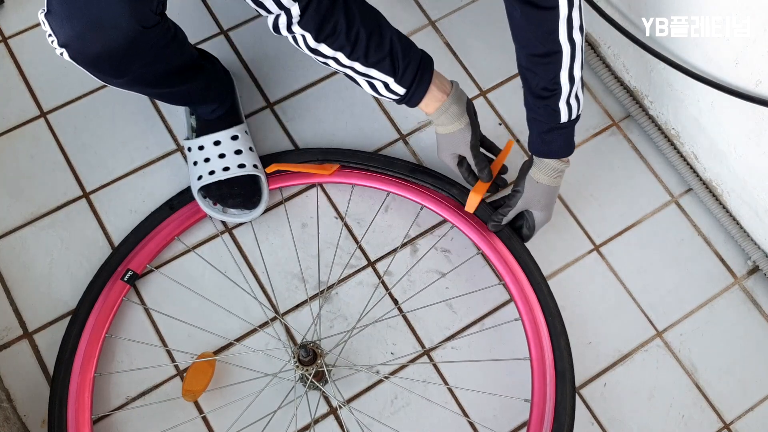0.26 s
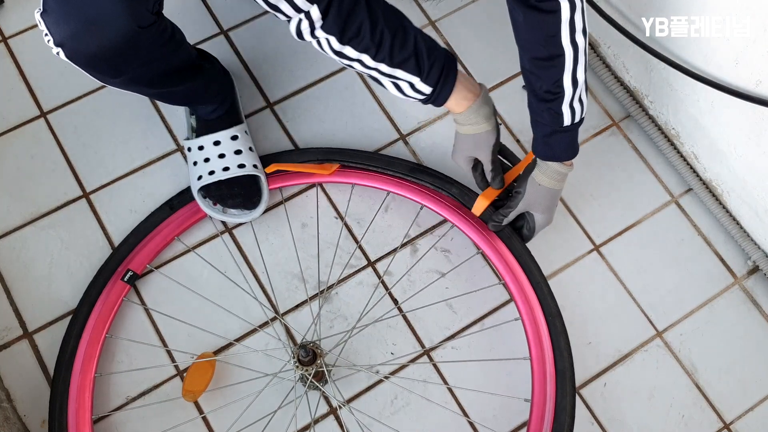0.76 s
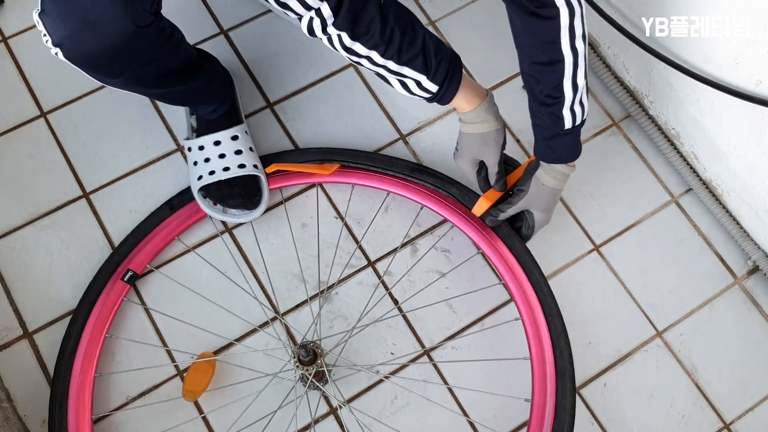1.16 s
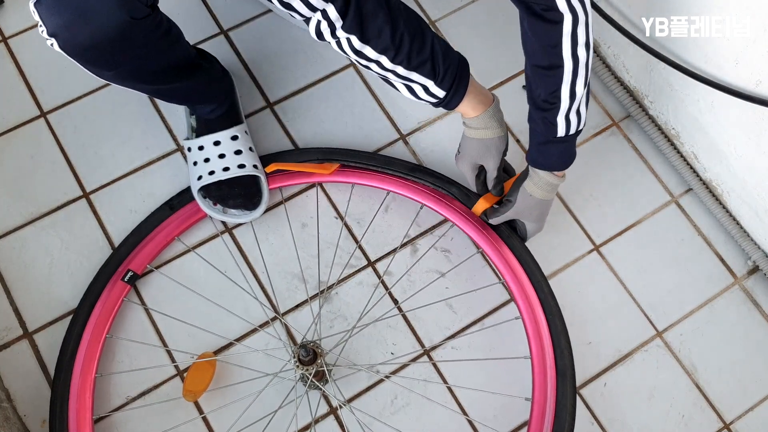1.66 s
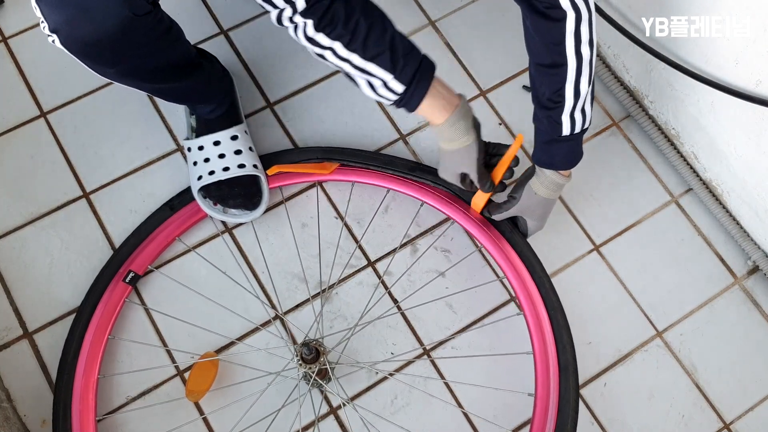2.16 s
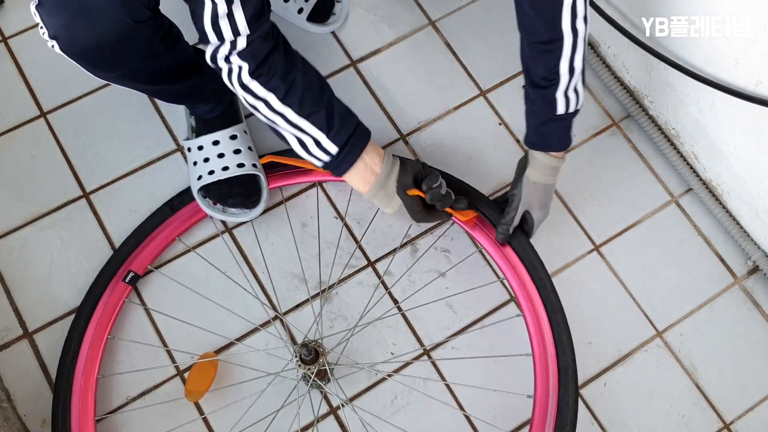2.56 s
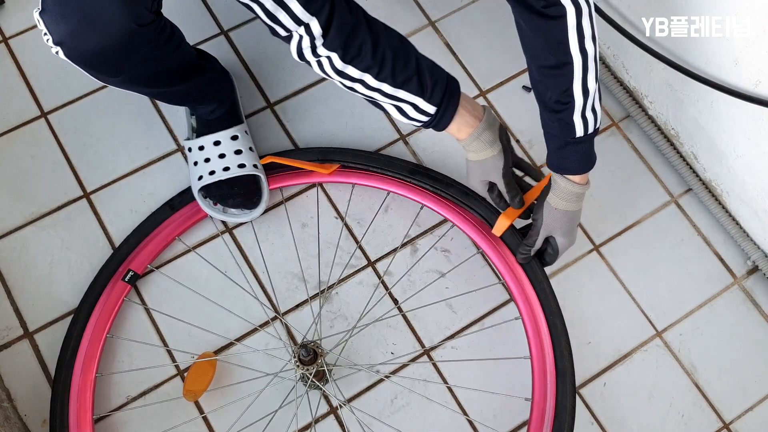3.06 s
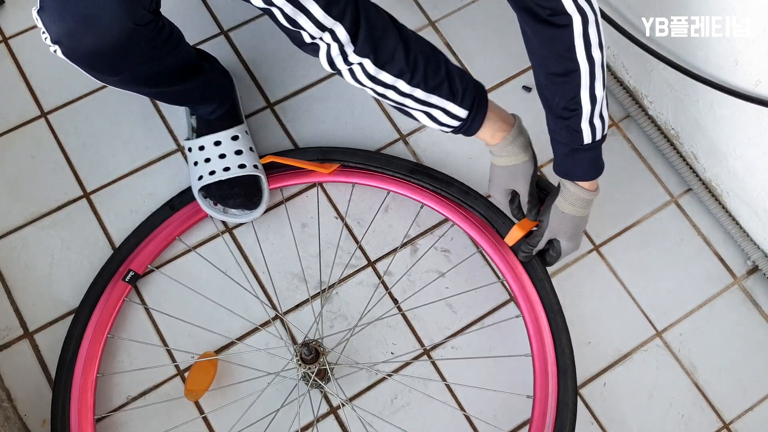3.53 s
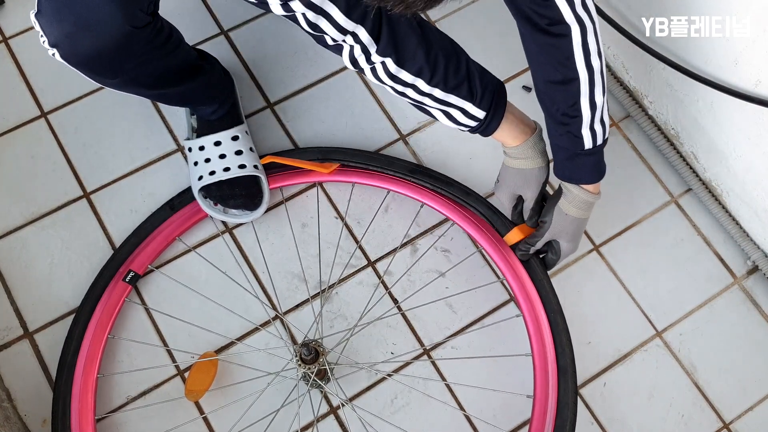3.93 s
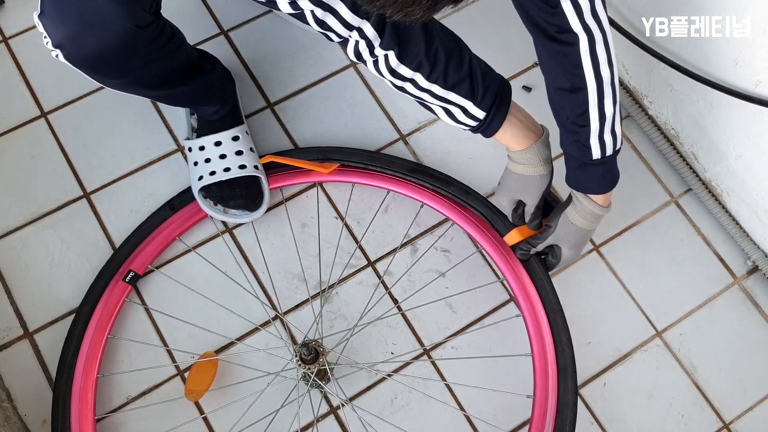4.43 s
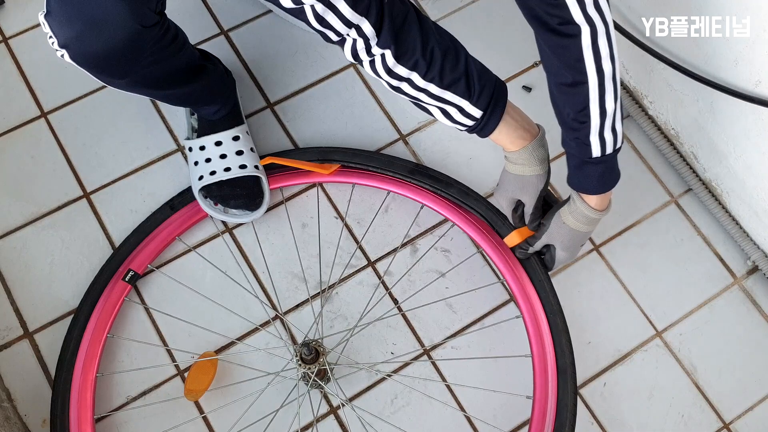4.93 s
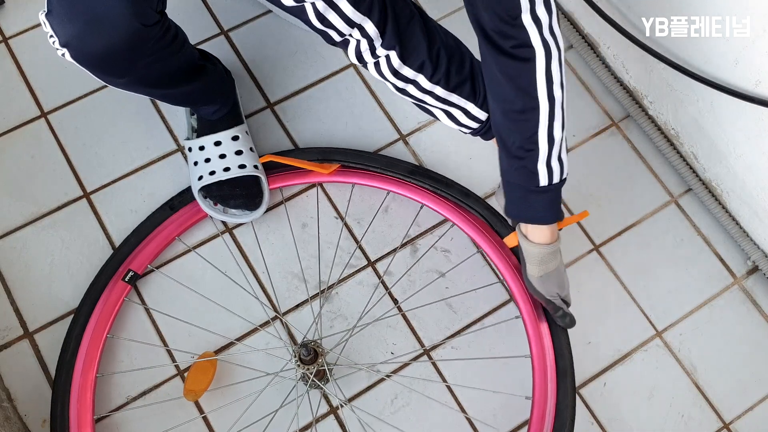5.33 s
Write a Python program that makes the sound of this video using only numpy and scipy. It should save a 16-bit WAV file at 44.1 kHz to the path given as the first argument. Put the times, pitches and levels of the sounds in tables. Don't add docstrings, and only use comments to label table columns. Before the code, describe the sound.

In a small hard-walled room, a plastic lever taps and scrapes a tire, mostly quietly and irregularly. Dull knocks stand out around 1.8 and 3.5 seconds. After a near-silent stretch, a loud snap rings the metal rim at about 5 seconds, with two lower thuds and creaks after it. A nearby stereo microphone also catches low rumble gusts, steady distant city hum and slight hiss.

```python
import sys
import numpy as np
from scipy import signal
from scipy.fft import rfft, irfft
from scipy.io import wavfile

SR = 44100
rng = np.random.default_rng(int(sys.argv[2]) if len(sys.argv) > 2 else 0)


def bounce(signal):
    frames = np.transpose(np.atleast_2d(signal))
    limited = np.clip(frames, -1, 1)
    pcm = np.round(limited * 32767).astype(np.int16)
    wavfile.write(sys.argv[1], SR, pcm)


def nominal_scale(level):
    x = np.asarray(level, float) / 20
    return 10 ** x


N = 246430


def at_hz(points, hz):
    table_hz, values = np.transpose(points)
    return np.interp(np.log(hz), np.log(table_hz), values)


def rms_one(x):
    return x / np.sqrt(np.mean(x ** 2) + 1e-20)


def high_pass(x, hz):
    return signal.sosfilt(signal.butter(3, hz, "high", fs=SR, output="sos"), x)


def edge(x):
    return high_pass(x, 4600)


def ring(force, modes):
    out = 0
    for k, (hz, level_db, t60) in enumerate(modes):
        radius = nominal_scale(-60 / (t60 * SR))
        angle = 2 * np.pi * hz / SR
        poles = [1, -2 * radius * np.cos(angle), radius ** 2]
        mode = signal.lfilter([0, np.sin(angle)], poles, force + 1e-18)
        out = out + (-1) ** k * nominal_scale(level_db) * mode
    return out


def struck(times, levels_db, modes):
    at = np.round(np.asarray(times) * SR).astype(int)
    spot_db = 1.5 * rng.standard_normal((len(at), len(modes)))
    out = 0
    for k, mode in enumerate(modes):
        force = np.zeros(N)
        force[at] = nominal_scale(levels_db + spot_db[:, k]) * (-1) ** k
        out = out + ring(force, [mode])
    return out


def grains(per_s, spread_db):
    sizes = nominal_scale(spread_db * np.minimum(rng.exponential(1, N), 4))
    signs = rng.choice([-1, 1], N)
    return rms_one(sizes * signs * (rng.random(N) < per_s / SR))


def swells(rows, rise_db_per_s, fall_db_per_s):
    start, length, *levels_db = np.transpose(rows)
    t = np.arange(0, N + 64, 64)[:, None] / SR
    early = np.maximum(start - t, 0)
    late = np.maximum(t - start - length, 0)
    shape = nominal_scale(-rise_db_per_s * early - fall_db_per_s * late)
    return [np.interp(np.arange(N) / SR, t[:, 0], shape @ nominal_scale(level_db)) for level_db in levels_db]


# f/Hz, likeness/0..1
LIKENESS = [(60, .97), (130, .997), (250, .95), (500, .9), (1000, .25), (3000, .12), (10000, .1)]


def stereo_noise(size):
    hz = np.arange(size // 2 + 1) * SR / size + 1
    mid, side = rfft(rng.standard_normal((2, size)))
    alike = np.clip(at_hz(LIKENESS, hz), 0, 1)
    white = np.sqrt(1 + alike) * mid + np.sqrt(1 - alike) * side * [[1], [-1]]
    return hz, white / np.sqrt(2)


# f/Hz, level/dB (per Hz)
HUM = [(95, -4.5), (234, -8.5), (290, -12.5), (379, -9), (600, -9.5), (1040, -3), (1650, -11.5),
       (2000, -25)]
# f/Hz, level/dB (per Hz)
HISS = [(2600, -1), (4200, -2), (5000, -6), (6300, -7), (8700, -14), (10500, -8), (13100, -3), (15500, -5)]
HUM_DB, HISS_DB = -61, -76.5


def hum():
    hz, white = stereo_noise(N)
    city = rms_one(irfft(white * nominal_scale(at_hz(HUM, hz)) * (hz > 90) * (hz < 2600), N))
    hiss = rms_one(irfft(white * nominal_scale(at_hz(HISS, hz)) * (hz >= 2600) * (hz < 15900), N))
    return nominal_scale(HUM_DB) * city + nominal_scale(HISS_DB) * hiss


# f/Hz, width/Hz, level/dB
RUMBLE_MODES = [(57.2, 16, 0), (96, 14.6, -13)]
# t/s, length/s, level/dB
GUSTS = [(0.0, 0.096, -60), (0.2, 0.11, -64), (0.4, 0.26, -65.5), (0.84, 0.013, -60.5), (1.09, 0.43, -52.5),
         (1.86, 0.24, -55.5), (2.22, 0.047, -49.5), (2.65, 0.018, -60.5), (2.77, 0.11, -52.5),
         (3.0, 0.13, -61.5), (3.32, 0.1, -49.5), (3.53, 0.017, -59), (3.72, 0.29, -57), (4.32, 0.014, -55),
         (4.55, 0.04, -64.5), (4.8, 0.11, -65), (5.065, 0.22, -51), (5.415, 0.016, -52), (5.56, 0.058, -52)]
GUST_RISE_DB_PER_S, GUST_FALL_DB_PER_S, LULL_DB = 231, 178, -75


def rumble():
    hz, white = stereo_noise(N)
    shape = 0
    for top_hz, width_hz, level_db in RUMBLE_MODES:
        shape = shape + nominal_scale(level_db) / (1 + (2 * (hz - top_hz) / width_hz) ** 2)
    gusts, = swells(GUSTS, GUST_RISE_DB_PER_S, GUST_FALL_DB_PER_S)
    return (nominal_scale(LULL_DB) + gusts) * rms_one(irfft(white * shape, N))


# t/s, length/s, scuff level/dB, scrape level/dB, shove level/dB
RUBS = [(0.0, 0.0033, -57.5, -48.5, -48), (0.47, 0.01, -76, -58, -59), (1.14, 0.015, -61, -65, -79),
        (1.22, 0.024, -63, -56.5, -53.5), (1.36, 0.047, -91, -72, -46.5), (1.49, 0.063, -88, -88, -58),
        (2.04, 0.034, -68.5, -47.5, -59), (2.28, 0.054, -77, -66, -47.5), (2.63, 0.13, -65.5, -55.5, -61.5),
        (2.8, 0.15, -70.5, -67, -58), (3.38, 0.1, -76.5, -67, -62.5), (4.28, 0.24, -85.5, -78, -89),
        (4.9, 0.042, -73, -59, -70), (5.2, 0.046, -72, -55, -41), (5.37, 0.028, -76, -55, -41.5),
        (5.5, 0.029, -86, -80, -42.5)]
# f/Hz, level/dB, t60/s
TICK = [(5230, 2.5, 0.0026), (6315, 3.5, 0.0039), (7470, 6.5, 0.004), (9320, 11.5, 0.0011),
        (10920, 12.5, 0.0012), (13400, 8.5, 0.0012), (15240, 4.5, 0.00099)]
# f/Hz, level/dB, t60/s
TREAD = [(1370, -3.5, 0.0069), (2380, 8, 0.0015), (2740, 3.5, 0.0026), (4670, -3, 0.0021)]
# f/Hz, level/dB, t60/s
THUMP = [(87.8, -7, 0.28), (145, 0, 0.17), (200, -9.5, 0.26), (219.8, -2.5, 0.14), (294, -35, 0.14),
         (327, -14.5, 0.22)]
# f/Hz, level/dB, t60/s
TIRE = [(414.3, -5, 0.031), (439.4, -22.5, 0.2), (501.6, -1.5, 0.048), (637, 0.5, 0.021),
        (656, -1.5, 0.036), (822, -9.5, 0.031)]
RUB_RISE_DB_PER_S, RUB_FALL_DB_PER_S = 578, 388
SCUFF_DB, SCRAPE_DB, CREAK_DB = 2.5, -13, -10
RUB_UNEVEN_DB, RUB_LUMPS_PER_S = 1.5, 90


def rubbing():
    bright, middle, shove = swells(RUBS, RUB_RISE_DB_PER_S, RUB_FALL_DB_PER_S)
    scuff = bright * rms_one(edge(ring(grains(4000, spread_db=-1), TICK)))
    scrape = middle * rms_one(ring(grains(1500, spread_db=2.5), TREAD))
    creak = shove * rms_one(ring(grains(120, spread_db=1.5), THUMP[1:] + TIRE))
    lumps = rng.standard_normal(600)
    lump_position = np.arange(N) / SR * RUB_LUMPS_PER_S
    grip = nominal_scale(RUB_UNEVEN_DB * np.interp(lump_position, np.arange(len(lumps)), lumps))
    return grip * (nominal_scale(SCUFF_DB) * scuff + nominal_scale(SCRAPE_DB) * scrape) + nominal_scale(CREAK_DB) * creak


# t/s, level/dB
RIM_BLOWS = [
    (5.065, -27),
    (5.311, -51.5),
    (5.417, -69),
]
# f/Hz, level/dB, t60/s
RIM = [(542, 1, 0.021), (567, -3, 0.071), (648, 0.5, 0.067), (707, -0.5, 0.036), (666, -14, 0.5),
       (756, -7, 0.1), (792, -20, 1), (865, -20, 0.57), (924, -8, 0.036), (1077, -10.5, 0.084),
       (1520, 1.5, 0.014), (1640, -9.5, 0.14), (1780, -3, 0.053), (2000, 1, 0.017), (2410, 2.5, 0.012),
       (3320, -12, 0.0071), (3760, 3.5, 0.011), (3840, -19, 0.036), (3990, -7, 0.013), (6290, -5, 0.013),
       (6370, -4, 0.026), (7200, 5.5, 0.0021)]


def rim():
    s, blow_db = np.transpose(RIM_BLOWS)
    return struck(s, blow_db - 4.5, RIM)


# t/s, edge tick level/dB, tip level/dB, handle level/dB
LEVER_TAPS = [(0.0925, -57, -82, -63), (0.186, -62, -87, -81), (0.2508, -56.5, -45, -46.5),
              (0.483, -76, -76, -57.5), (1.1068, -65.5, -67, -61), (1.2982, -72, -79, -50.5),
              (1.3436, -57, -54, -49.5), (1.4532, -66.5, -93, -67), (1.4938, -82, -68, -56),
              (1.83, -64.5, -31.5, -38), (2.2744, -71.5, -84, -63), (2.3241, -66, -58, -54),
              (2.4657, -73, -55.5, -72), (2.6176, -52.5, -38, -45), (3.1482, -74, -86, -84),
              (3.366, -77, -67, -74), (3.5146, -51, -34, -44.5), (4.2759, -71, -57.5, -61.5),
              (4.8845, -69.5, -76, -59), (5.066, -51, -26, -51), (5.31, -67.5, -74, -40),
              (5.4177, -62, -31.5, -36.5)]
# f/Hz, level/dB, t60/s
TIP = [(2740, 2.5, 0.00097), (3580, 3, 0.00093), (4280, -1, 0.0011), (4930, -5, 0.00082)]
# f/Hz, level/dB, t60/s
LEVER = [(1120, 1.5, 0.0016), (1566, 3.5, 0.0047), (1750, 1.5, 0.0042), (2128, -4, 0.0042)]
# t/s, tire level/dB, floor thump level/dB
WHEEL_JOLTS = [(0.0912, -62.5, -84), (0.187, -60, -90), (0.2508, -68, -57), (0.4825, -57.5, -74),
               (1.1063, -73, -57), (1.2978, -52, -47), (1.3453, -57.5, -44), (1.4521, -62, -51),
               (1.4961, -50.5, -42), (1.8289, -34, -30), (2.2748, -79, -54), (2.3241, -53, -52),
               (2.6184, -46, -54), (3.1487, -82, -56.5), (3.5149, -39.5, -36), (4.168, -80, -62),
               (4.2751, -64.5, -79), (4.884, -58, -85), (5.0652, -34.5, -20.5), (5.3108, -35.5, -29.5),
               (5.4185, -38.5, -22.5)]


def knocks():
    s, tick_db, tip_db, handle_db = np.transpose(LEVER_TAPS)
    tick = edge(struck(s, tick_db + 11.5, TICK))
    tip = struck(s, tip_db + 11.5, TIP)
    handle = struck(s, handle_db + 12.5, LEVER)
    s, tire_db, thump_db = np.transpose(WHEEL_JOLTS)
    tire = struck(s, tire_db + 1.5, TIRE)
    thump = struck(s, thump_db - 11.0, THUMP)
    return tick + tip + handle + tire + thump


# f/Hz, t60/s
ROOM_T60 = [(100, .42), (260, .42), (700, .38), (1840, .39), (4000, .36), (7000, .29), (12800, .26)]
# f/Hz, level/dB
ROOM_COLOUR = [(100, -23), (300, -4), (700, 1), (1500, -1.5), (12000, 0)]
DIRECT_DB, ROOM_DB = 3.5, 8.5
FIRST_WALL_S, ROOM_BUILD_S = 0.0011, 0.0031
NEAR_DB, NEAR_S = 4.5, 0.0028


def tiled_room(x):
    size = 32768
    hz, white = stereo_noise(size)
    t = np.maximum(np.arange(size) / SR - FIRST_WALL_S, 0)
    tail = 0
    for centre in 60 * 2 ** np.arange(0, 8.5, .5):
        band = np.maximum(1 - 2 * np.abs(np.log2(hz / centre)), 0)
        decay_db = at_hz(ROOM_COLOUR, centre) - 60 * t / at_hz(ROOM_T60, centre)
        tail = tail + irfft(white * band, size) * nominal_scale(decay_db)
    tail = tail * (1 - np.exp(-t / ROOM_BUILD_S)) * (1 + nominal_scale(NEAR_DB) * np.exp(-t / NEAR_S))
    response = nominal_scale(ROOM_DB) * tail / np.sqrt(np.sum(tail ** 2) / 2)
    response[:, 0] += nominal_scale(DIRECT_DB)
    return signal.fftconvolve(response, x[None], axes=1)[:, :N]


LEFT_DB, RIGHT_LAG = -2, 15


def scene():
    wheel = high_pass(knocks() + rim() + rubbing(), 75)
    left, right = tiled_room(wheel) + rumble() + hum()
    return np.array([left * nominal_scale(LEFT_DB / 2), np.roll(right, RIGHT_LAG) * nominal_scale(-LEFT_DB / 2)])


def top_cut(x):
    return signal.sosfilt(signal.butter(12, 16990, fs=SR, output="sos"), x)


def record(dry):
    cut = signal.sosfilt(signal.cheby2(12, 40, 16200, fs=SR, output="sos"), dry)
    return top_cut(cut)


dry = scene()
out = record(dry)
bounce(out)
```